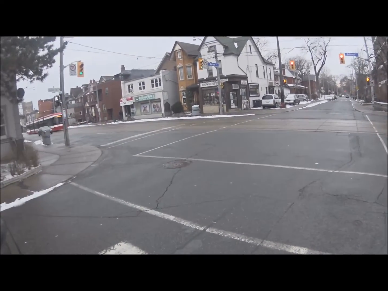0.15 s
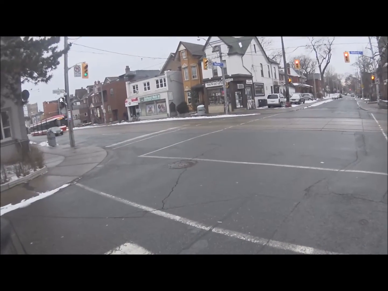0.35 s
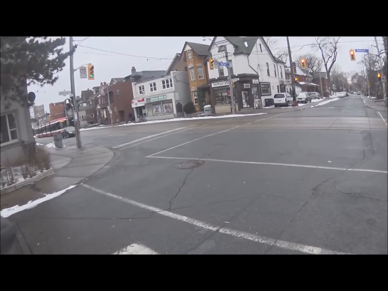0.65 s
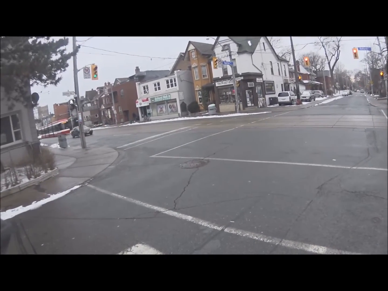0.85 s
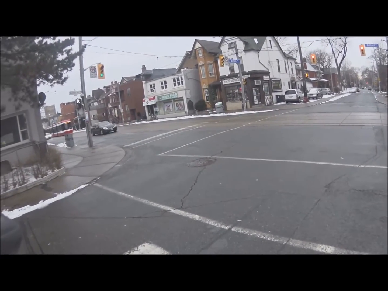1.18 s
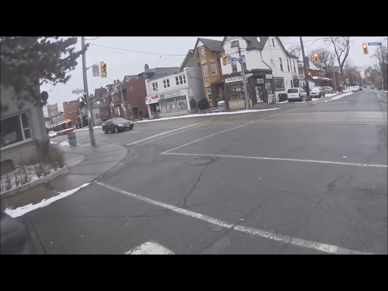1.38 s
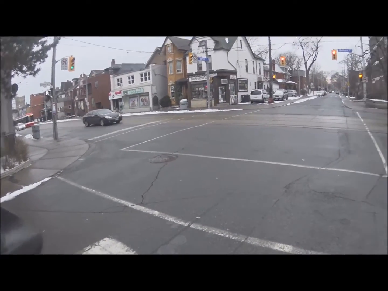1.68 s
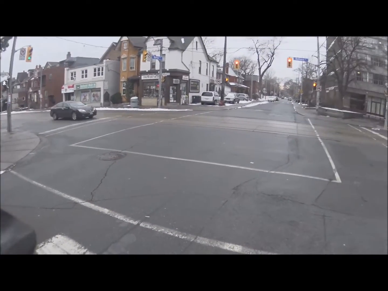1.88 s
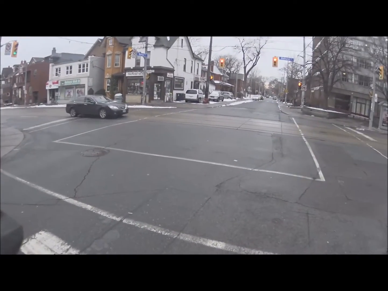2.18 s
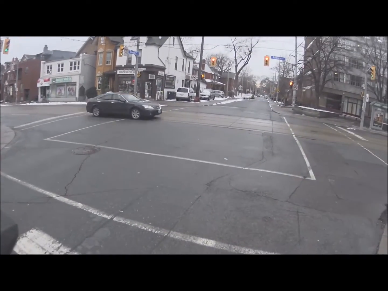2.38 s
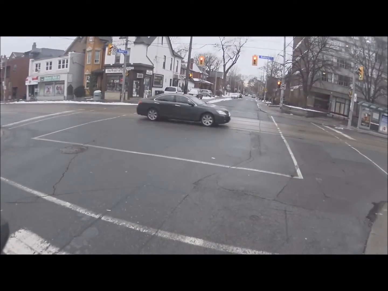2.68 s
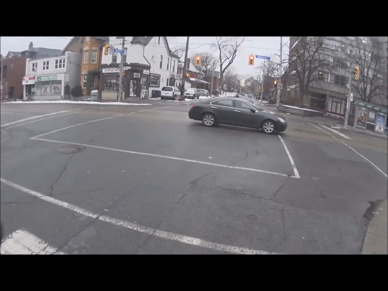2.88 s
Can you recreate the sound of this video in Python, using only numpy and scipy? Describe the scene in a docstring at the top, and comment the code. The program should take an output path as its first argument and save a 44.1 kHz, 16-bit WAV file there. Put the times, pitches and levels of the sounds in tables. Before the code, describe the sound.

A car approaches from the left on damp asphalt, tyres roaring and hissing over distant traffic.

```python
"""Distant traffic, an engine drone and low rumble run throughout as a car on damp asphalt comes in from the left.
Its tyres roar, sizzle and throw up a fine spray: shaped noises, the body noise and spray rising as it nears.
Bumps over seams and wet patches come throughout, strongest late; two buffets of wind blow and bits of grit
snap as short sine bursts. Near the end the splash behind the wheels opens up; house fronts echo the car.
A small camera hears it all: its case rings near 1.5 and 2.6 kHz and colours its two microphone ports differently."""
import sys
import numpy as np
from scipy import signal
from scipy.fft import rfft, irfft
from scipy.io import wavfile
from scipy.ndimage import uniform_filter1d, map_coordinates

SR = 44100
rng = np.random.default_rng(int(sys.argv[2]) if len(sys.argv) > 2 else 0)


def generate_wav(signal):
    """Clip the signal to [-1, 1] and save it as 16-bit WAV at the path in sys.argv[1]."""
    frames = np.transpose(np.atleast_2d(signal))
    scaled = np.clip(frames, -1, 1) * 32767
    pcm = np.round(scaled).astype(np.int16)
    wavfile.write(sys.argv[1], SR, pcm)


N = 134064  # samples, about 3 s


def undb(db):
    """Decibels to gain."""
    return 10 ** (np.asarray(db) / 20)


def bin_hz():
    """The frequency of each bin of the spectrum."""
    return np.arange(N // 2 + 1) * SR / N


def per_bin(points):
    """A table over frequency, joined by straight lines on a log axis."""
    hz, value = np.array(points, float).T
    return np.interp(np.log(bin_hz() + 1), np.log(hz), value)


def over_time(points, t):
    """A table over time, joined by straight lines."""
    seconds, value = np.array(points).T
    return np.interp(t, seconds, value)


# How alike the two ports hear a noise. Each row: frequency in Hz, likeness from 0 to 1.
PORT_LIKENESS = [(30, .95), (200, .92), (750, .88), (910, .75), (1400, .99), (1800, .96), (2000, .65),
                 (2350, .87), (2620, .5), (3100, .83), (5600, .87), (7500, .62), (10500, .7)]


def noise(db):
    """Stereo noise of rms 1 with the given spectrum, partly alike at the two ports."""
    shared, left, right = rfft(rng.standard_normal((3, N)))
    alike = np.clip(per_bin(PORT_LIKENESS), 0, 1)
    spectrum = np.sqrt(alike) * shared + np.sqrt(1 - alike) * np.array([left, right])
    x = irfft(spectrum * undb(db), N)
    return x / x.std()


def band(hz, octaves):
    """Stereo noise in a bell around one frequency."""
    away = np.log2((bin_hz() + 1) / hz) / octaves
    return noise(-20 * np.log10(1 + away ** 2))


def walk(rate):
    """A slow random drift with a spread near 1, drawing about rate new values per second."""
    hold = int(SR / rate)
    steps = np.repeat(rng.standard_normal(N // hold + 2), hold)
    smooth = uniform_filter1d(uniform_filter1d(steps, hold), hold)
    return smooth[:N] * np.sqrt(2)


def blow(age, rise_s):
    """An envelope that peaks at 1 after rise_s and dies away."""
    u = np.maximum(age, 0) / rise_s
    return u * np.exp(1 - u)


TOWN_DB, RUMBLE_DB, GUST_DB = -37, -60, 1  # traffic level, rumble level, spread of the rumble's drift
BUFFET_HZ, BUFFET_RISE_S = 32.17, 0.04
# Colour of the far traffic. Each row: frequency in Hz, relative level in dB per Hz.
TRAFFIC_SPECTRUM = [(30, 6), (100, -10), (280, 1), (600, -11), (1400, 2.5), (2500, 3.5), (4000, -8.5),
                    (5800, -7), (7500, -22), (11000, -52)]
# Swells of the engine drone. Each row: time in seconds, level in dB.
DRONE_SWELLS = [(0, -51), (.5, -54.5), (.8, -50), (1.0, -72), (1.5, -59), (1.8, -51.5), (2.3, -52),
                (2.6, -60), (3.04, -54)]
# Colour of the engine drone. Each row: frequency in Hz, relative level in dB per Hz.
DRONE_SPECTRUM = [(40, -14), (62, -5), (81, 0), (100, -7), (145, -4), (200, -10), (300, -13), (500, -25)]
# Colour of the rumble. Each row: frequency in Hz, relative level in dB per Hz.
RUMBLE_SPECTRUM = [(8, -23), (20, 3), (40, -2.5), (65, -15.5), (120, -6.5), (400, -64)]
# Wind buffeting the camera. Each row: start in seconds, level in dB.
WIND_BUFFETS = [(1.2, -49), (1.98, -49)]


def town(t):
    """Far traffic, the drone of engines and an uneven rumble, all shaped noise, with two buffets of wind."""
    traffic = undb(TOWN_DB + 0.18 * walk(3.0)) * noise(per_bin(TRAFFIC_SPECTRUM))
    drone = undb(over_time(DRONE_SWELLS, t)) * noise(per_bin(DRONE_SPECTRUM))
    rumble = undb(RUMBLE_DB + GUST_DB * walk(6.86)) * noise(per_bin(RUMBLE_SPECTRUM))
    gusts = sum(undb(db) * blow(t - start, BUFFET_RISE_S) for start, db in WIND_BUFFETS)
    wind = gusts * band(BUFFET_HZ, octaves=.4)
    return traffic + drone + rumble + wind


# Echoes from the house fronts. Each row: delay at the start in seconds, level in dB relative to the
# direct sound, change of delay in seconds per second as the car moves.
HOUSE_ECHOES = [(0.024, -15, 0.0031), (0.039, -12.5, 0.00059), (.058, -17, .0026), (0.085, -16.5, -.0034)]


def house_fronts(x):
    """The sound together with its echoes across the junction, whose paths change as the car moves."""
    t = np.arange(N) / SR
    out = x
    for delay, db, drift in HOUSE_ECHOES:
        read_at = (t - delay - drift * t) * SR  # in samples; mirrored before the start
        echo = np.array([map_coordinates(side, [read_at], mode="mirror") for side in x])
        out = out + undb(db) * echo
    return out


# Snaps of grit under the tread. Each row: start in seconds, level in dB before panning, centre in Hz.
GRIT_SNAPS = [(1.923, -37, 6410), (2.058, -16.5, 5800), (2.061, -13.5, 2570), (2.110, -11, 2680),
              (2.193, -13.5, 2800), (2.841, -16, 4490)]
GRIT_RISE_S, GRIT_OCTAVES, GRIT_TAIL_DB, GRIT_TAIL_S = 0.00028, 0.2, -20, 0.02


def grit(t):
    """Sine snaps of a few cycles, each with a faint noise tail from the street."""
    out = 0
    for start, db, hz in GRIT_SNAPS:
        age = t - start
        snap = blow(age, GRIT_RISE_S) * np.sin(2 * np.pi * hz * age)
        decay = (age > 0) * np.exp(-np.abs(age) / GRIT_TAIL_S)
        tail = undb(GRIT_TAIL_DB) * decay * band(hz, GRIT_OCTAVES)
        out = out + undb(db) * (snap + tail)
    return out


# Seams and wet patches under the tyres. Each row: start in seconds, level in dB, centre in Hz.
ROAD_SEAMS = [(.635, -55, 8570), (.77, -37.5, 871), (1.36, -38, 1350), (2.062, -34.5, 950),
              (2.549, -29.5, 1450), (2.964, -26.5, 1384)]
SEAM_RISE_S, SEAM_OCTAVES = 0.013, 0.24


def seams(t):
    """Short swells of tyre noise at seams and wet patches in the road."""
    return sum(undb(db) * blow(t - start, SEAM_RISE_S) * band(hz, SEAM_OCTAVES)
               for start, db, hz in ROAD_SEAMS)


WAKE_DB = -30.5  # fully open
WAKE_OPENS_M, WAKE_EDGE_M = -4.5, 1.11  # where along the lane it comes into earshot, and how gradually
# Colour of the splash. Each row: frequency in Hz, relative level in dB per Hz.
WAKE_SPECTRUM = [(3000, -22), (4300, 5.5), (5200, -26), (6300, 7), (7200, -3), (8200, -12), (9500, -16),
                 (10500, -16)]


def wake(along):
    """Bright splash behind the wheels, heard once the car is nearly side-on."""
    opening = 1 / (1 + np.exp((WAKE_OPENS_M - along) / WAKE_EDGE_M))
    return undb(WAKE_DB) * opening * noise(per_bin(WAKE_SPECTRUM))


SPRAY_DB, DROPS_DB = -33, -36.5  # at the nearest point, before panning
SPRAY_FALL = 2.31  # power of distance: fades faster than the body noise
# Colour of hiss and droplets. Each row: frequency in Hz, relative level in dB per Hz.
SPRAY_SPECTRUM = [(800, -34), (2500, -0.5), (4300, 0), (6500, -2), (8000, -10.5), (9300, -16), (11000, -32)]


def spray(near, per_s=900, scatter_db=4):
    """Water peels off the tread: a noise hiss with tiny randomly timed droplet ticks in it."""
    hits = (rng.random(N) < per_s / SR) * rng.choice([-1, 1], N)
    sizes_db = scatter_db * np.minimum(rng.exponential(size=N), 4)
    drops = irfft(rfft(hits * undb(sizes_db)) * undb(per_bin(SPRAY_SPECTRUM)), N)
    hiss = noise(per_bin(SPRAY_SPECTRUM)) * undb(0.13 * walk(15))
    return near ** SPRAY_FALL * (undb(SPRAY_DB) * hiss + undb(DROPS_DB) * drops / drops.std())


BODY_DB, BODY_FALL = -31.5, 1.236  # level at the nearest point, power of distance
ROAR_DB, SIZZLE_DB = -9.5, -10.5  # trims added to the two level tables
SIZZLE_HZ, SIZZLE_OCTAVES = 2585, 0.27
TREAD_FLUTTER_DB, FLUTTER_PER_S = 1.53, 51
# Colour of the body's rolling noise. Each row: frequency in Hz, relative level in dB per Hz.
BODY_SPECTRUM = [(40, -43), (120, -8.5), (230, -1.5), (450, 0), (700, 1), (1200, -8.5), (2600, -3.5),
                 (4500, -6.5), (6000, -5), (8000, -35), (11000, -52)]
# Tread roar as the asphalt changes. Each row: time in seconds, level in dB before its trim.
ROAR_SWELLS = [(0, -27.5), (.4, -26.5), (.7, -27.5), (.8, -23), (1.0, -25), (1.38, -20), (1.5, -24),
               (1.68, -22), (1.86, -22), (2.1, -21.5), (2.4, -20.5), (2.52, -19), (2.74, -21.5),
               (3.04, -18.5)]
# Colour of the tread roar. Each row: frequency in Hz, relative level in dB per Hz.
ROAR_SPECTRUM = [(300, -30), (700, -13.5), (1050, -2), (1330, -2), (1470, 3), (1620, 0), (1900, -5),
                 (2600, -17.5), (4000, -11.5), (8000, -46)]
# The tread's higher sizzle. Each row: time in seconds, level in dB before its trim.
SIZZLE_SWELLS = [(0, -29.5), (.15, -28), (.35, -31.5), (.9, -28.5), (1.02, -26), (1.4, -23), (1.95, -25),
                 (2.1, -22), (2.7, -19.5), (2.9, -22), (3.04, -28)]


def tyres(t, near):
    """Rolling noise of the body; the tread's roar and higher sizzle flutter with the road's texture."""
    roar_db = over_time(ROAR_SWELLS, t) + ROAR_DB + TREAD_FLUTTER_DB * walk(FLUTTER_PER_S)
    sizzle_db = over_time(SIZZLE_SWELLS, t) + SIZZLE_DB + TREAD_FLUTTER_DB * walk(FLUTTER_PER_S)
    body = undb(BODY_DB) * near ** BODY_FALL * noise(per_bin(BODY_SPECTRUM))
    roar = undb(roar_db) * noise(per_bin(ROAR_SPECTRUM))
    sizzle = undb(sizzle_db) * band(SIZZLE_HZ, SIZZLE_OCTAVES)
    return body + roar + sizzle


SPEED_M_S, NEAREST_S, LANE_M = 9.12, 3.266, 11.8  # speed, time of nearest point, distance there
PAN_DB = 4.5  # left minus right for spray and grit when the car is far off to the left


def scene():
    """The car drives along a straight lane, growing louder and brighter as it nears."""
    t = np.arange(N) / SR
    along = SPEED_M_S * (t - NEAREST_S)  # metres, negative on the left
    distance = np.hypot(along, LANE_M)
    near = LANE_M / distance  # 1 at the nearest point
    pan_db = -PAN_DB * along / distance
    treble = (spray(near) + grit(t)) * undb(np.array([pan_db, -pan_db]) / 2)
    car = tyres(t, near) + seams(t) + treble
    return house_fronts(car) + wake(along) + town(t)


# Resonances and notches of the case. Each row: centre in Hz, width in Hz, left in dB, right in dB.
CASE_RESONANCES = [(223.3, 8.3, 5.5, 3), (434, 17, 3.5, 6), (593, 76, -4, -3), (1020, 85, 5, -0.5),
                   (1287, 23, 2, 4), (1507, 50, 2.5, 0.5), (1432, 562, 8, 8), (1707, 70, 5.5, 3),
                   (1846, 55, 1.5, 7), (2085, 150, -9, -0.5), (2358, 320, 5.5, 1.5), (2616, 136, 6, -1.5),
                   (4530, 850, 4.5, 3.5), (5620, 240, 3, 1.5), (10260, 480, 7.5, 4)]
# Level between the two ports. Each row: frequency in Hz, left minus right in dB.
PORT_LEVELS = [(30, 1), (200, -5), (800, -3), (1500, -2.5), (2200, -3.5), (2900, 5), (5000, 0.5),
               (7500, 2.5), (10500, -2)]
# Phase between the two ports. Each row: frequency in Hz, lead of the left in radians.
PORT_PHASES = [(30, -0.11), (200, -0.68), (750, -0.97), (950, -1.45), (1300, -0.74), (1900, -0.66),
               (2050, -0.26), (2400, 0.6), (2560, 2.3), (2720, -0.75), (3500, -0.4), (5500, -0.45),
               (10500, -.4)]
TOP_HZ = 11050


def record(dry):
    """The case rings, the ports differ in level and phase, and the top is cut."""
    f = bin_hz()
    sides = np.array([[1], [-1]]) / 2
    case_db = sum(np.array([[left], [right]]) / (1 + (2 * (f - hz) / width) ** 2)
                  for hz, width, left, right in CASE_RESONANCES)
    gain = undb(case_db + sides * per_bin(PORT_LEVELS))
    # causal phase, so that resonances ring after the sound; one for both ports
    cepstrum = irfft(np.log(gain).mean(axis=0), N)
    ring = 2 * rfft(cepstrum[:N // 2], N).imag
    phase = ring + sides * per_bin(PORT_PHASES)
    x = irfft(rfft(dry) * gain * np.exp(1j * phase), N)
    return signal.sosfilt(signal.ellip(12, .1, 90, TOP_HZ, fs=SR, output="sos"), x)


dry = scene()
out = record(dry)
generate_wav(out)
```